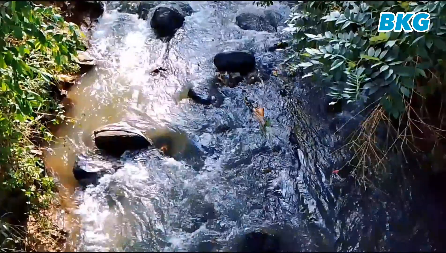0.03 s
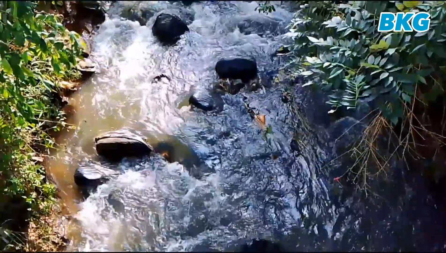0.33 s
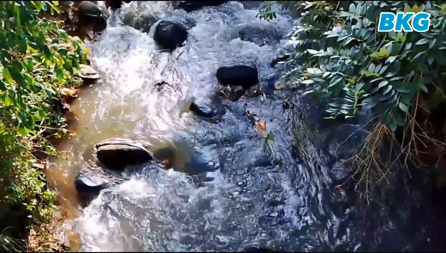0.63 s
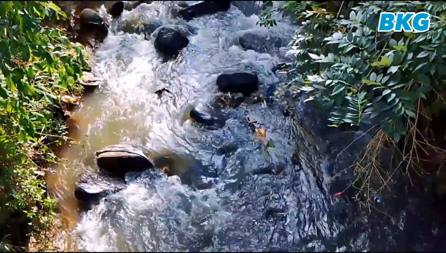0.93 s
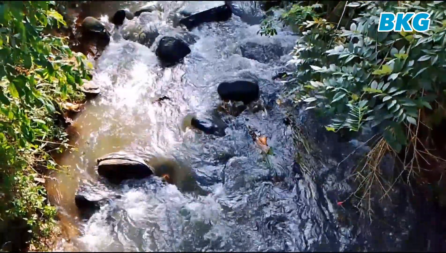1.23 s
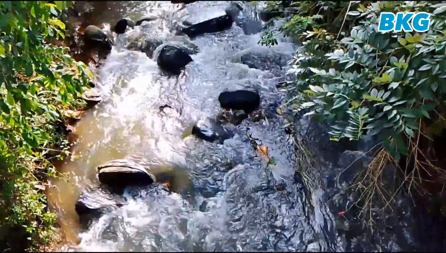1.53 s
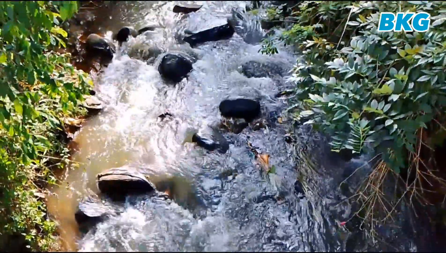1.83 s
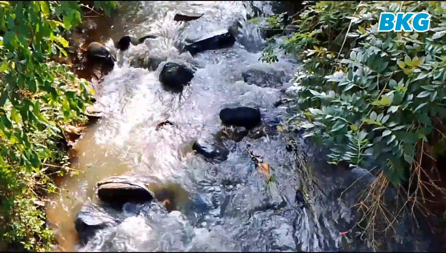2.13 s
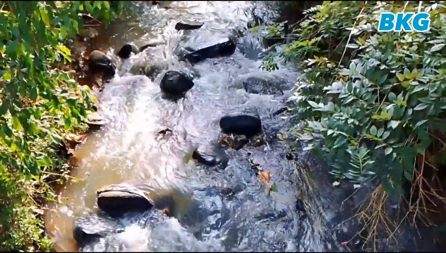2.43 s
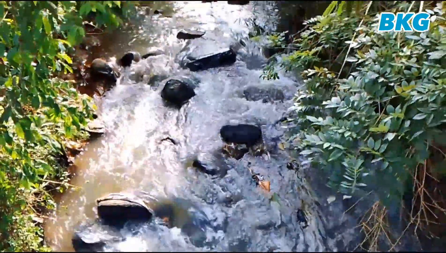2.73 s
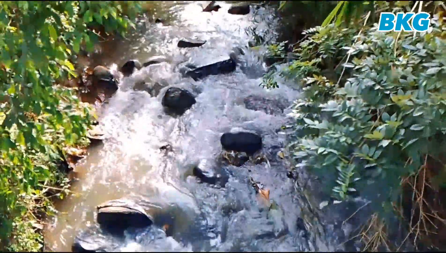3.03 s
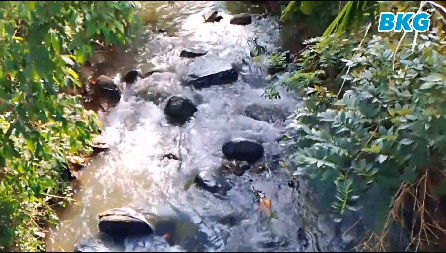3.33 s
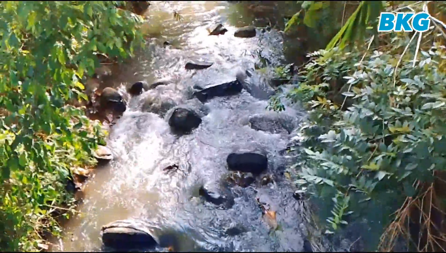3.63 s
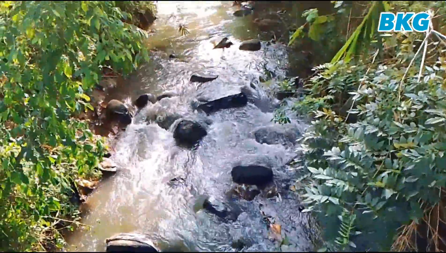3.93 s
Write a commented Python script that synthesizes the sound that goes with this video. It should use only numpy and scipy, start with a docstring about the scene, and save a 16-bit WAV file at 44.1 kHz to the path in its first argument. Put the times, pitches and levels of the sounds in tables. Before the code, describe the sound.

A shallow stream rushes over stones, heard from the bank outdoors. The bubbling white water grows a little fuller as the microphone turns upstream, with small splashes and hollow plops on the nearest rocks.

```python
"""A shallow stream rushes over stones, heard in mono from the bank.
Countless air bubbles ring in a wash of white water that grows fuller as the microphone turns upstream.
Water splashes on the nearest stones, large air pockets gulp and plop,
and a faint rumble comes and goes underneath. The level dips briefly at the very start."""
import sys
import numpy as np
from scipy import signal
from scipy.fft import rfft, irfft
from scipy.io import wavfile
from scipy.ndimage import uniform_filter1d

SR = 44100
rng = np.random.default_rng(int(sys.argv[2]) if len(sys.argv) > 2 else 0)


def dump(signal):
    """Clip the signal to [-1, 1] and save it as 16-bit WAV at the path in sys.argv[1]."""
    limited = np.clip(np.atleast_2d(signal).T, -1, 1)
    pcm = np.round(limited * 32767).astype(np.int16)
    wavfile.write(sys.argv[1], SR, pcm)


N = 176400

# Tone of the rumble. Each row: frequency in Hz, relative level in dB.
RUMBLE_COLOUR = [(15, -17), (28, -17), (45, -1), (70, -4), (115, -2.5), (150, -9.5), (220, -43), (600, -80)]
# Fader ride on the rumble. Each row: time in seconds, relative level in dB.
RUMBLE_RIDE = [(0.06, -80.5), (0.66, -73), (0.68, -87), (0.81, -73), (1.15, -85), (1.23, -74),
               (1.32, -80.5), (2.02, -80), (2.09, -86), (2.17, -72.5), (2.5, -63.5), (2.54, -72.5),
               (3.9, -81.5), (4.0, -84)]
# Large air pockets. Each row: start in seconds, pitch in Hz, relative peak in dB,
# attack in seconds, decay time in seconds.
AIR_POCKETS = [(.203, 543, -44, .0066, 0.004), (.235, 336, -46, .008, .009), (.53, 396, -49, .008, .009),
               (.648, 330, -47, .008, .009), (.936, 1184, -43, 0.0053, 0.0078),
               (1.04, 360, -45, .008, 0.0091), (1.39, 2260, -41.5, .0045, .006),
               (1.435, 265, -49.5, 0.011, .010), (1.506, 515, -45, .005, 0.008),
               (1.643, 262, -45.5, 0.0096, 0.015), (1.975, 639, -44.5, .02, .02),
               (2.208, 649, -41.5, 0.0088, 0.019), (2.256, 381, -41.5, .01, 0.0099),
               (2.386, 356, -34, 0.019, 0.011), (2.454, 1184, -35.5, 0.0078, .007),
               (2.695, 343, -42, 0.0079, 0.0069), (2.698, 1394, -43, .005, .0092),
               (2.79, 743, -39, 0.0061, 0.0088), (2.975, 1660, -41, .0044, .0045),
               (2.978, 499, -24, 0.011, 0.0059), (3.007, 490, -40, .0043, .0093),
               (3.025, 432, -39.5, 0.012, .0076), (3.066, 1070, -41.5, 0.0098, .01),
               (3.2, 2346, -38, 0.011, 0.011), (3.206, 266, -43, 0.013, 0.0084),
               (3.441, 309, -42.5, 0.012, 0.017), (3.464, 588, -37.5, .007, .0075),
               (3.561, 830, -38.5, .0052, .005), (3.602, 1905, -40, 0.0074, .009),
               (3.634, 620, -41.5, .016, .008), (3.672, 332, -38.5, 0.0082, .016),
               (3.693, 501, -38.5, 0.0095, 0.0095), (3.788, 298, -40.5, 0.0052, 0.016),
               (3.815, 1136, -43.5, 0.026, 0.022), (3.827, 1670, -38, 0.0055, 0.0086),
               (3.838, 527, -40.5, .0093, 0.015), (3.916, 653, -37, .0058, 0.0045),
               (3.94, 312, -41.5, 0.01, 0.0057)]
# Water hitting stones, from low gurgles to fine spray. Each row: start in seconds, centre in Hz,
# width in octaves, relative level in dB, time to the crest in seconds.
STONE_SPLASHES = [(.34, 2500, .5, -52, .03), (.505, 4500, 0.65, -56.5, 0.028), (.55, 2500, .5, -49.5, .03),
                  (1.169, 3320, 1.1, -55, .035), (1.5, 2340, 0.43, -47.5, .055),
                  (1.86, 2430, 0.62, -49.5, 0.057), (2.255, 2550, 0.44, -44.5, 0.022),
                  (2.449, 1218, 0.88, -41, 0.0099), (2.44, 2720, .7, -48, .025),
                  (2.57, 650, 1.5, -48, .025), (2.785, 2300, 0.44, -46.5, 0.024),
                  (2.962, 1360, .9, -42.5, .018), (3.058, 1000, 0.52, -45, 0.013),
                  (3.185, 2540, 0.43, -48.5, 0.023), (3.265, 1820, 0.21, -46.5, 0.012),
                  (3.465, 450, 1.14, -47, 0.028), (3.53, 500, 1.15, -46.5, .025),
                  (3.578, 1790, .35, -45.5, 0.021), (3.598, 700, 0.83, -45.5, 0.026),
                  (3.75, 460, 0.49, -47, 0.018), (3.825, 3020, 1.14, -51, 0.031)]
# Bubble swarms. Each row: lowest and highest pitch in Hz, bubbles per second, mean cycles to fall
# by 1/e, spread of strength in dB, level against the wash in dB.
BUBBLE_SWARMS = [(217.5, 796, 230, 2.87, 2.5, -2), (803, 3000, 520, 7.8, 2.5, -7.5),
                 (3016, 6000, 800, 13, 0.5, -8.5), (5900, 15500, 700, 12.5, 3.5, -8.5)]
# Tone of the rushing water. Each row: frequency in Hz, relative level in dB.
WATER_COLOUR = [(100, -55), (160, -35), (200, -14.5), (250, -3.5), (330, -2.5), (400, -3.5), (500, -2.5),
                (630, -3.4), (1000, -4), (1400, -2), (1850, -3), (2350, 1), (2800, -1.5), (3200, -7),
                (4200, -8.5), (5500, -16.5), (7400, -25.5), (8800, -25), (10500, -31.5), (12500, -42.5),
                (14000, -41.5), (15600, -34.5)]
# Fader ride on the rushing water. Each row: time in seconds, relative level in dB.
WATER_RIDE = [(0.06, -45.7), (0.28, -46.5), (0.6, -46.5), (1.05, -46.2), (1.4, -45.5), (1.68, -46),
              (1.84, -44.5), (2.2, -44.5), (2.38, -44), (2.55, -43), (2.8, -43), (3.37, -43), (3.7, -42.5),
              (4.0, -42)]
# Facing the rapids gives more body and less treble. Each row: frequency in Hz, gain in dB.
RAPIDS_EQ = [(200, 1), (300, 2.5), (450, 0.5), (650, 2.5), (1000, 1.6), (1500, 1), (2400, -2.3),
             (4000, -2.5), (14000, -2.6)]
# The microphone turns upstream. Each row: time in seconds, share of the rapids EQ from 0 to 1.
MIC_TURN = [(0, 0.35), (1.1, 0.34), (1.7, 0.14), (2.1, 0.6), (2.4, 0.58), (2.9, 0.6), (3.3, 1),
            (3.65, 0.82), (4.0, 0.83)]
# Level at the opening: starts high, dips briefly, then holds steady. Each row: time in seconds, gain in dB.
OPENING_DIP = [(.012, 12), (.015, -14), (.03, -40), (.036, -25), (.044, 3)]

BUBBLE_RISE, PLOP_RISE = 0.028, 0.012  # share of pitch gained per decay time
BUBBLE_ATTACK = 0.28  # in decay times


def amp(db):
    """Decibels to gain."""
    return 10 ** (np.asarray(db) / 20)


def unit(x):
    """Scales to rms 1."""
    return x / np.sqrt(np.mean(x ** 2) + 1e-20)


def at_hz(points, hz):
    """Reads an EQ curve on a log-frequency axis."""
    f, value = np.transpose(points)
    return np.interp(np.log(hz + 1), np.log(f + 1), value)


def at_time(points, t):
    """Reads a control curve."""
    return np.interp(t, *np.transpose(points))


def add(mix, start_s, sound):
    """Mixes a sound in at its start time."""
    part = mix[max(round(start_s * SR), 0):][:len(sound)]
    part += sound[:len(part)]


def drift(shape, size):
    """Smooth random movement over a frequency-by-time grid."""
    noise = rng.standard_normal(shape)
    for axis, width in enumerate(size):
        for _ in range(2):
            noise = uniform_filter1d(noise, width, axis, mode="wrap")
    return unit(noise)


def rumble(trim_db=0.5):
    """Faint low buffeting, likely air moving over the microphone."""
    colour = amp(at_hz(RUMBLE_COLOUR, np.fft.rfftfreq(N, 1 / SR)))
    noise = irfft(rfft(rng.standard_normal(N)) * colour, N)
    return unit(noise) * amp(trim_db + at_time(RUMBLE_RIDE, np.arange(N) / SR))


def bubble(hz, attack_s, decay_s, rise):
    """An air bubble swells, rings and dies away while its pitch creeps up."""
    t = np.arange(0, attack_s + 5 * decay_s, 1 / SR)
    attack = np.sin(np.pi / 2 * np.minimum(t / attack_s, 1))
    tail = np.exp(-np.maximum(t - attack_s, 0) / decay_s)
    glide = 1 + rise * (t - attack_s) / decay_s
    return attack * tail * np.sin(2 * np.pi * hz * np.cumsum(glide) / SR)


def plops():
    """Large air pockets close behind the nearest stones, each ringing as one bubble."""
    out = np.zeros(N)
    for start_s, hz, db, attack_s, decay_s in AIR_POCKETS:
        add(out, start_s, amp(db) * bubble(hz, attack_s, decay_s, PLOP_RISE))
    return out


def splashes(spray_share=0.65, bubbles_per_s=900, decay_cycles=6.5):
    """Water breaks on a stone: a cloud of small bubbles and spray swells and subsides."""
    out = np.zeros(N)
    t = np.arange(SR // 3) / SR
    for start_s, hz, octaves, db, crest_s in STONE_SPLASHES:
        band = hz * 2 ** (octaves * np.array([-.5, .5]))
        bandpass = signal.butter(3, band, "bandpass", fs=SR, output="sos")
        spray = signal.sosfilt(bandpass, rng.standard_normal(len(t)))
        draws = rng.random((1000, 2))
        cloud = np.zeros(len(t))
        for when, pitch in draws[:int(bubbles_per_s * t[-1])]:
            ring_hz = band[0] + pitch * (band[1] - band[0])
            decay_s = decay_cycles / ring_hz
            add(cloud, when * t[-1], bubble(ring_hz, BUBBLE_ATTACK * decay_s, decay_s, BUBBLE_RISE))
        swell = (t / crest_s * np.exp(1 - t / crest_s)) ** 2
        blend = unit(spray_share * unit(spray) + (1 - spray_share) * unit(cloud))
        add(out, start_s, amp(db) * swell * blend)
    return out


def swarm(low_hz, high_hz, per_s, cycles, spread_db, level_db):
    """Bubbles of random size and strength ring across one band."""
    draws = rng.random((6000, 4))
    out = np.zeros(N)
    for when, pitch, strength, damping in draws[:int(per_s * N / SR)]:
        hz = low_hz + pitch * (high_hz - low_hz)
        decay_s = cycles * (.5 + damping) / hz
        accent_db = spread_db * min(-np.log(1 - strength), np.pi)  # a few bubbles stand out
        gain = amp(accent_db) / np.sqrt(decay_s)
        add(out, when * N / SR, gain * bubble(hz, BUBBLE_ATTACK * decay_s, decay_s, BUBBLE_RISE))
    band_share = (high_hz - low_hz) / (SR / 2)
    return amp(level_db) * unit(out) * np.sqrt(band_share)


def rushing_water(patch_db=0.43, surge_db=0.28, flicker_db=0.09, trim_db=-0.84,
                  hiss_hz=2000, low_cut_hz=185):
    """Wash and bubbles surge unevenly and gain body as the microphone faces the rapids."""
    wash = rng.standard_normal(N)
    bubbles = sum(swarm(*row) for row in BUBBLE_SWARMS)
    hz, t, spectrum = signal.stft(wash + bubbles, SR, nperseg=1024, noverlap=768)
    churn_db = patch_db * drift(spectrum.shape, size=(9, 6))
    churn_db += surge_db * drift((1, len(t)), size=(1, 14))
    churn_db += flicker_db * drift((1, len(t)), size=(1, 2))
    power = 1 + sum(amp(db) ** 2 * ((hz >= low) & (hz < high)) for low, high, *_, db in BUBBLE_SWARMS)
    colour = amp(at_hz(WATER_COLOUR, hz))
    hiss_power = np.mean(colour ** 2 * (hz > hiss_hz))
    colour /= np.sqrt(hiss_power * power)  # the hiss anchors the level; swarms add only texture
    turn_db = at_hz(RAPIDS_EQ, hz)[:, None] * at_time(MIC_TURN, t)
    gain = amp(trim_db + at_time(WATER_RIDE, t) + turn_db + churn_db)
    rush = signal.istft(spectrum * colour[:, None] * gain, nperseg=1024, noverlap=768)[1][:N]
    # Almost nothing sounds below the pitch of the largest bubbles.
    return signal.sosfilt(signal.butter(10, low_cut_hz, "highpass", fs=SR, output="sos"), rush)


def scene():
    """The stream, the same in both channels."""
    return np.tile(rushing_water() + splashes() + plops() + rumble(), (2, 1))


def record(dry):
    """The level dips briefly at the very start, and a steep high cut takes off the very top."""
    dipped = dry * amp(at_time(OPENING_DIP, np.arange(N) / SR))
    high_cut = signal.firwin(511, cutoff=15800, window=("kaiser", 9), fs=SR)
    return signal.oaconvolve(dipped, high_cut[None], "same")


dry = scene()
out = record(dry)
dump(out)
```